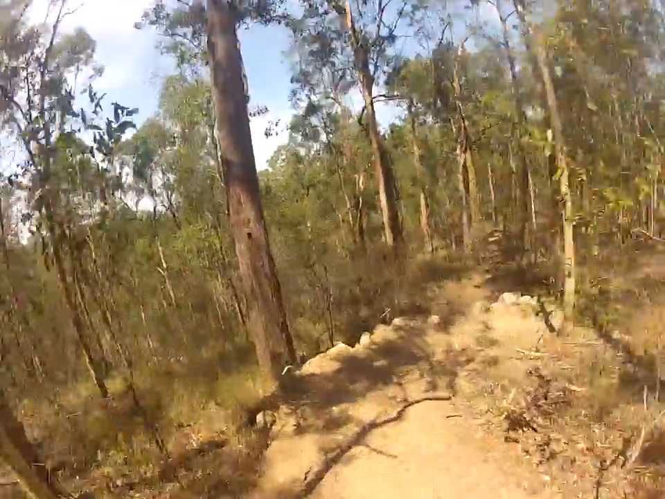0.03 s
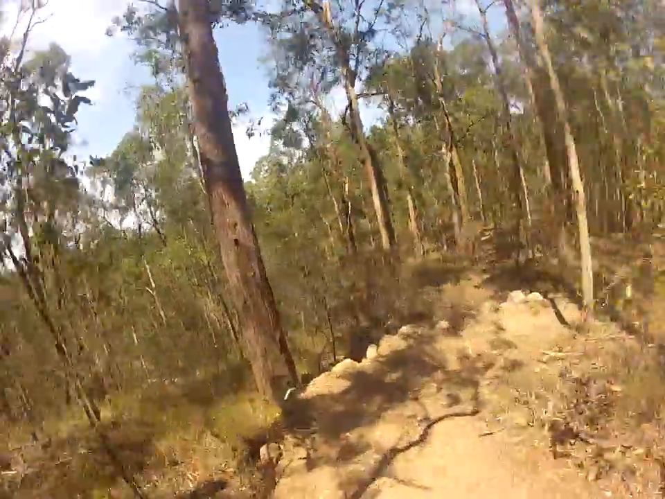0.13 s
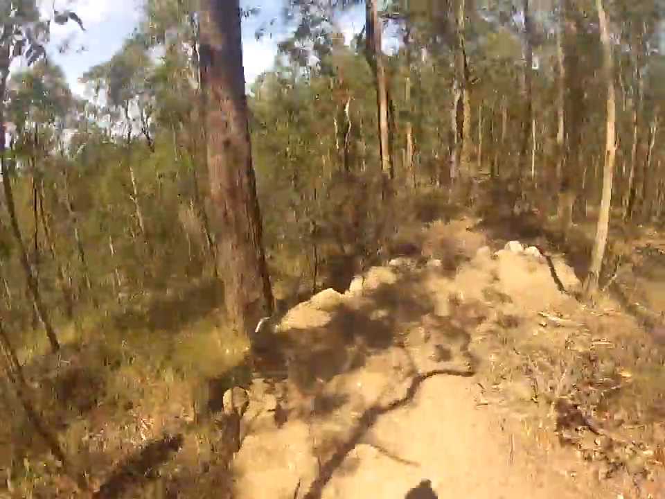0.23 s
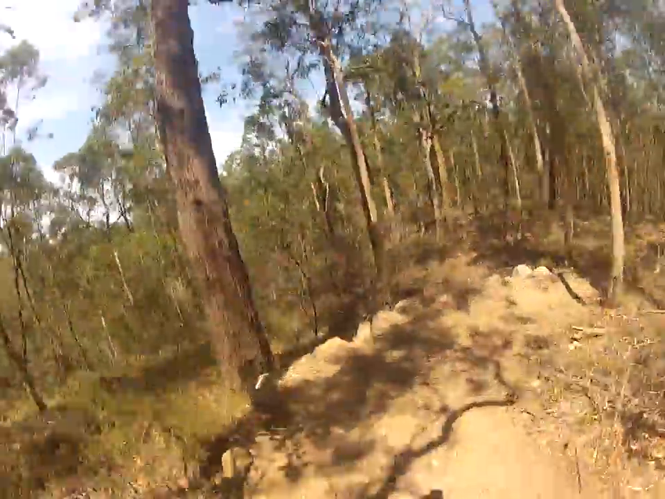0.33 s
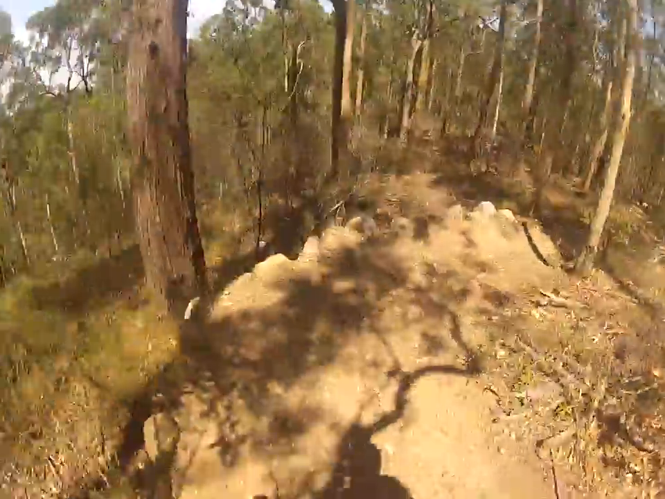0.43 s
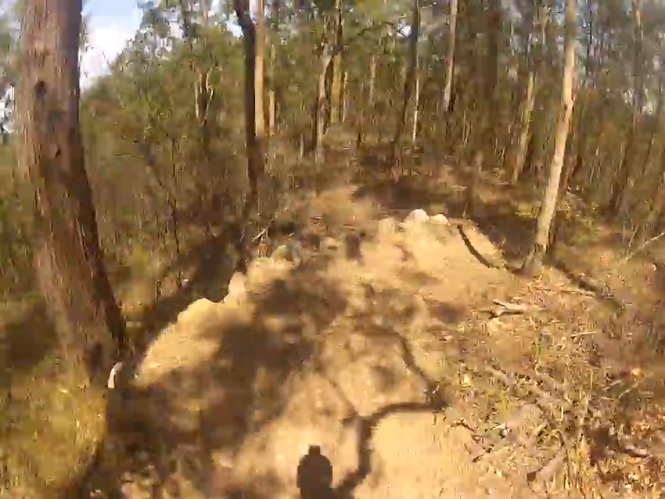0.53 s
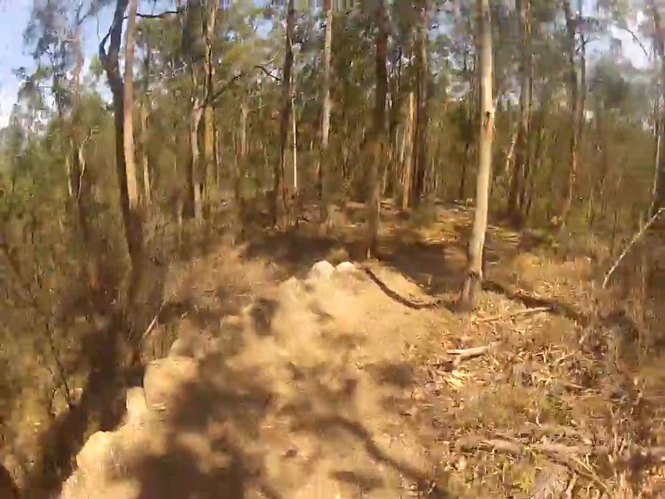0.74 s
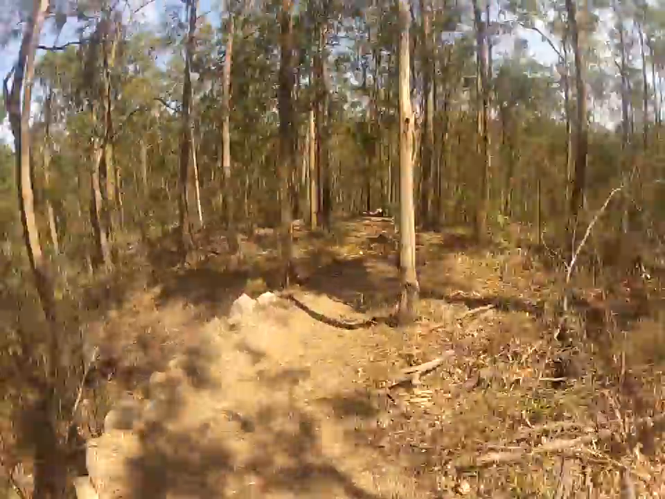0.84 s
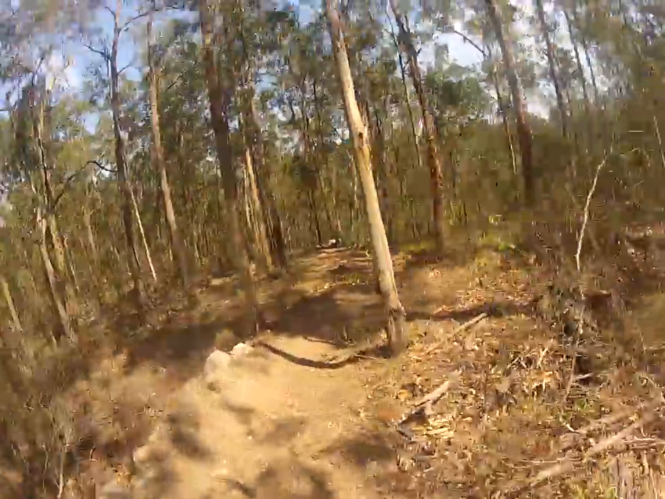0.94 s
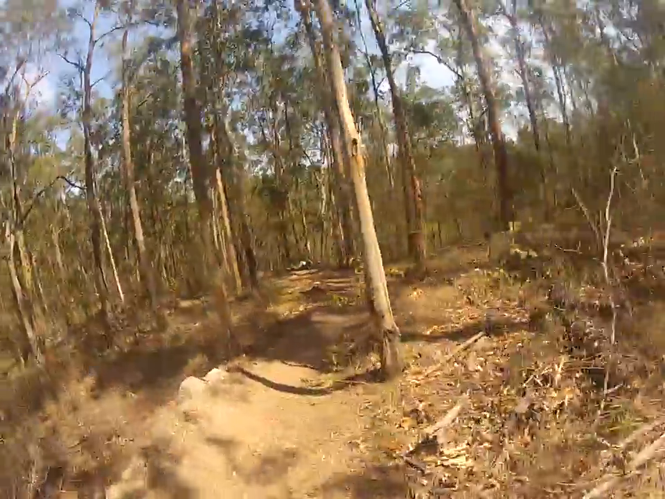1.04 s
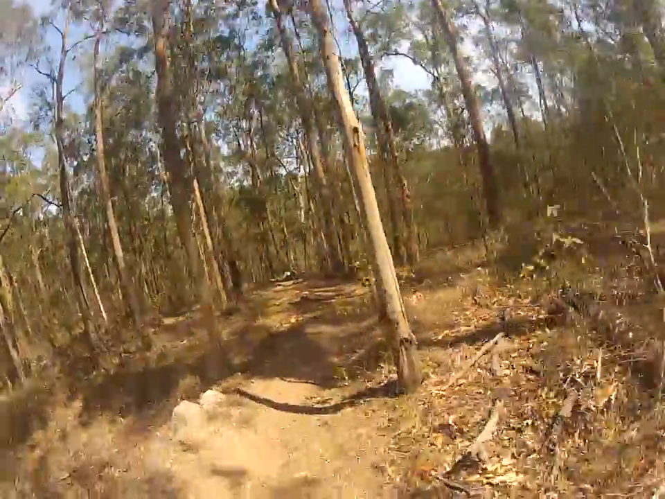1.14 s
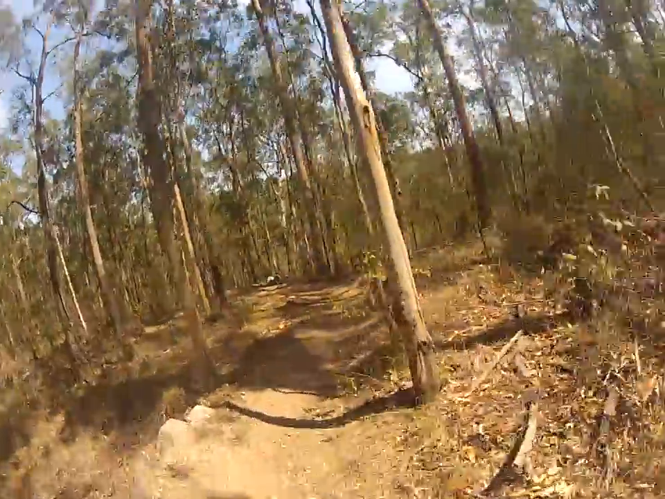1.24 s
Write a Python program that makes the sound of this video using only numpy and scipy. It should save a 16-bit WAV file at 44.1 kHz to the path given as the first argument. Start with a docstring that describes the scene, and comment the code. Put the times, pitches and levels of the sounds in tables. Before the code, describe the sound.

A mountain bike rattles and thumps over a dirt trail, with low wind rumble.

```python
"""Low thumps and wind rumble are heard as a mountain bike jolts over dry dirt, from a camera riding along.
Bumps shake the camera mount and air buffets the microphone. A hard part knocks three times and the
chain clatters, each impact exciting damped modes. The tyres scrub over grit and drone through the
frame; then the bike coasts on with a faint whirr. The recorder's sample-and-hold adds a gritty treble."""
import sys
import numpy as np
from scipy import signal
from scipy.fft import rfft, irfft
from scipy.io import wavfile

SR = 44100
rng = np.random.default_rng(int(sys.argv[2]) if len(sys.argv) > 2 else 0)


def wrap_up_sound(samples):
    """Save the sound to the file named by the first command line argument, as 16-bit audio."""
    columns = np.atleast_2d(samples).T
    # keep every value between -1 and 1, then stretch to whole-number steps
    tamed = np.clip(columns, -1, 1)
    steps = np.round(tamed * 32767).astype(np.int16)
    wavfile.write(sys.argv[1], SR, steps)


N = 57330
T = np.arange(N) / SR

# bumps that shake the camera mount (time [s], level [dB], frequency [Hz], swell time [s])
MOUNT_THUMPS = [(.036, -15, 82.6, 0.0099), (0.279, -5, 78.2, 0.011), (0.346, -11.5, 84.7, 0.0093),
                (.442, -3.5, 72.5, 0.0127), (0.5261, -5.5, 83.7, 0.0057), (0.655, -12.5, 88.4, 0.016),
                (0.702, -10.5, 83.2, 0.01), (0.744, -12, 73.7, .012)]
# buffets of air on the microphone (time [s], level [dB], frequency [Hz], swell time [s])
AIR_BUFFETS = [(0.24, -12.5, 35.4, 0.0073), (0.317, -13.5, 24.3, 0.0071), (.390, -5.5, 27.2, 0.016),
               (0.495, -2, 36.3, 0.004), (0.648, -12.5, 30, 0.01), (0.69, -5.5, 27, 0.01),
               (0.786, -18, 21.1, 0.005)]
# dull blows of the tyres on the ground (time [s], level [dB], decay time [s])
TYRE_THUDS = [(0.031, -52, 0.036), (0.24, -20.5, 0.0082), (0.264, -23.5, 0.019), (.284, -18.5, 0.0034),
              (0.4637, -17.5, 0.0089), (.525, -28, 0.0026), (.741, -29.5, 0.013), (0.803, -33, 0.0077),
              (.979, -37, 0.0037)]
# spectrum of those blows (frequency [Hz], relative level [dB])
THUD_SPECTRUM = [(70, -23), (160, 11), (260, -0.5), (420, -16.5), (700, -18), (1150, -11.5), (1700, -36),
                 (3000, -45)]
# three hard knocks, with faint ones after the first (time [s], peak level [dB])
HARD_KNOCKS = [(0.2396, -6.5), (.2665, -23), (.2845, -38), (.3255, -31), (0.4185, -11), (0.7209, -11.5)]
# modes of the knocked part (frequency [Hz], relative level [dB], t60 [s])
PART_MODES = [(945, -7.5, 0.0098), (1168, -4, 0.011), (1895, 0, .023), (2115, -11.5, 0.036),
              (2495, -9, .02), (3715, -20.5, 0.015)]
# showers of chain-link impacts (time [s], level [dB], decay time [s], tilt [dB/octave])
CHAIN_SHOWERS = [(0.266, -32.5, 0.017, -9.5), (0.3343, -28.5, 0.0077, -3), (0.386, -27, 0.0079, -3),
                 (0.4591, -18.5, 0.0048, 5), (0.462, -12.5, 0.0042, -0.5), (0.479, -14.5, 0.0039, -2),
                 (0.662, -37, 0.01, 11), (0.674, -26.5, 0.0039, 0), (0.805, -38, 0.008, -3),
                 (0.978, -40.5, 0.013, -11)]
# modes of the frame before tilting (frequency [Hz], relative level [dB], t60 [s])
FRAME_MODES = [(1140, -17, 0.018), (1665, 0.5, 0.02), (1834, 4, 0.0093), (2020, 0, 0.0096),
               (2420, 2.5, 0.016), (2853, -15, 0.074), (3040, -23, 0.0098), (3662, -8, 0.027),
               (4070, -8.5, 0.0066), (5230, -7.5, 0.005)]
# envelope of the tyre noise on dirt (time [s], level [dB])
TYRE_LEVEL = [(0, -58.5), (.05, -51.5), (.11, -55.5), (.22, -49.5), (.29, -41), (.32, -52), (.37, -42),
              (.43, -43), (.455, -32), (.50, -41), (.55, -48), (.573, -49), (.582, -34.5), (.612, -37.5),
              (.630, -35.5), (.645, -41.5), (.68, -36.5), (.70, -42), (.76, -47.5), (.87, -52), (.98, -50),
              (1.3, -55.5)]
# spectrum of rolling tyres (frequency [Hz], relative level [dB])
ROLL_SPECTRUM = [(300, -2), (650, -4), (1150, -7), (1850, 2.5), (2400, -0.5), (3000, -6), (3700, -13.5),
                 (4300, -14.5), (5800, -24.5)]
# spectrum of scrubbing tyres (frequency [Hz], relative level [dB])
SCRUB_SPECTRUM = [(300, -3.5), (700, -30), (1200, -13.5), (1600, 2), (2400, -3), (3200, -11.5), (3650, -8),
                  (4300, -20), (5200, -19), (5800, -23)]
# resonances in the tyre noise (frequency [Hz], width [Hz], lift [dB])
TYRE_RESONANCES = [(896, 100, 7.5), (1158, 186, 12.5), (1912, 55, 4), (2453, 130, 4), (2952, 140, 6),
                   (3630, 160, 6.5)]
# light ticks of the coasting hub (time [s], peak level [dB])
TICKS = [(.0045, -37), (.0675, -37.5), (.0755, -37), (.1205, -42), (.132, -37.5), (.176, -34), (.1985, -42),
         (.2125, -33)]
# modes of the hub (frequency [Hz], relative level [dB], t60 [s])
TICK_MODES = [(2020, -10, 0.011), (2415, -4.5, 0.031)]
# whirr of the coasting wheel (time [s], centre frequency [Hz], level [dB])
WHEEL_WHIRR = [(0, 2345, -55), (.10, 2350, -66), (0.138, 2380, -51), (0.269, 2400, -61.5),
               (0.801, 2829, -75), (.87, 3030, -84), (0.921, 2950, -51.5), (1.051, 2937, -67),
               (1.17, 2465, -57), (1.3, 2280, -59)]
# small stones flicked by the tyres (time [s], level [dB], decay time [s])
STONE_FLICKS = [(.884, -61, 0.0046), (1.138, -53, 0.008)]
# spectrum of a flicked stone (frequency [Hz], relative level [dB])
STONE_SPECTRUM = [(2000, -25), (3600, -12), (4400, 8), (5200, -3), (6000, -18)]
# envelope of the tyre drone in the frame (time [s], level [dB])
DRONE_LEVEL = [(0, -50), (.06, -43.5), (.15, -47.5), (.22, -49), (.26, -38), (.32, -35.5), (.36, -37.5),
               (.42, -27), (.47, -21.5), (.50, -36), (.60, -45.5), (.65, -35.5), (.69, -25.5), (.73, -33),
               (.78, -48), (.89, -56.5), (.99, -55.5), (1.1, -53.5), (1.3, -53.5)]
# spectrum of the drone (frequency [Hz], relative level [dB])
DRONE_SPECTRUM = [(40, -9), (90, 7), (130, -1), (240, 0), (330, -11), (500, -21.5), (800, -32.5),
                  (1500, -49)]
# envelope of the wind rumble (time [s], level [dB])
WIND_LEVEL = [(0, -34.5), (.07, -28.5), (.12, -46), (.18, -33), (.25, -31), (.55, -20), (.595, -44.5),
              (.65, -20), (.76, -31), (.85, -31.5), (.90, -44), (1.04, -38.5), (1.3, -44)]
# spectrum of the wind (frequency [Hz], relative level [dB])
WIND_SPECTRUM = [(8, -32), (22, 3), (45, -10.5), (85, -10.5), (130, -24.5), (300, -60)]


def amp(db):
    """Amplitude grows tenfold every 20 dB."""
    return 10 ** (np.asarray(db) / 20)


def unit(x):
    """Normalisation to rms 1."""
    return x / np.sqrt(np.mean(x ** 2) + 1e-20)


def curve(points):
    """Linear interpolation of (time, value) points at every sample."""
    return np.interp(T, *np.transpose(points))


def colour(x, spectrum, peaks=()):
    """Spectral shaping, with resonances as bell-shaped lifts; the result has rms 1."""
    hz, db = np.transpose(spectrum)
    f = np.fft.rfftfreq(N, 1 / SR)
    base_db = np.interp(np.log(f + 1), np.log(hz), db)
    lift_db = sum(height / (1 + (2 * (f - centre) / width) ** 2) for centre, width, height in peaks)
    return unit(irfft(rfft(x) * amp(base_db + lift_db), N))


def noise(spectrum):
    """Filtered white noise takes on the filter's spectrum."""
    return colour(rng.standard_normal(N), spectrum)


def drift(hz):
    """Low-passed noise gives a slow random fluctuation of rms 1."""
    return unit(signal.sosfilt(signal.butter(2, hz, fs=SR, output="sos"), rng.standard_normal(N)))


def since(start):
    """Seconds since an event, zero before it."""
    return np.maximum(T - start, 0)


def burst(start, db, decay, rise_s=0.00022):
    """An impact envelope: quick rise, exponential decay."""
    t = since(start)
    return amp(db) * (1 - np.exp(-t / rise_s)) * np.exp(-t / decay)


def clicks(per_s, spread_db=0):
    """Shot noise: independent impulses of random sign."""
    size = amp(spread_db * np.minimum(rng.exponential(1, N), 4))
    return unit(size * rng.choice([-1, 1], N) * (rng.random(N) < per_s / SR))


def ring(modes):
    """Superposed damped modes; alternating signs make the ring swell just after the blow."""
    t = T[:SR // 10]
    return sum((-1) ** k * amp(db - 60 * t / t60) * np.sin(2 * np.pi * hz * t)
               for k, (hz, db, t60) in enumerate(modes))


def wobble(start, db, hz, swell):
    """A heavily damped oscillation whose envelope peaks at the swell time."""
    t = since(start)
    return -amp(db) * t / swell * np.exp(1 - t / swell) * np.sin(2 * np.pi * hz * t)


def jolts():
    """Transient excitation: tyres thud on ridges, the mount shudders, air pushes on the microphone."""
    thuds = sum(burst(*row) for row in TYRE_THUDS) * noise(THUD_SPECTRUM)
    shudders = sum(wobble(*row) for row in MOUNT_THUMPS)
    buffets = sum(wobble(*row) for row in AIR_BUFFETS)
    return thuds + shudders + buffets


def knocks(events, modes, rise_s=0.00056, glide_s=0.00099):
    """Free vibration: a hard part rings in the same modes after every blow."""
    tone = ring(modes)
    t = T[:len(tone)]
    lag = 0.41 * glide_s * (1 - np.exp(-t / glide_s))  # starts 41% flat and slides up to pitch
    tone = np.interp(t - lag, t, tone) * (1 - np.exp(-t / rise_s))
    tone /= abs(tone).max()
    return sum(amp(db) * np.interp(since(start), t, tone) for start, db in events)


def chain_clatter(links_per_s=3300, pivot_hz=2000):
    """Convolution: each click of a chain link sets off the frame's impulse response."""
    out = np.zeros(N)
    for start, db, decay, tilt in CHAIN_SHOWERS:
        frame = ring([(hz, level + tilt * np.log2(hz / pivot_hz), t60) for hz, level, t60 in FRAME_MODES])
        force = burst(start, db, decay) * clicks(links_per_s)
        out += signal.fftconvolve(force, frame / np.linalg.norm(frame))[:N]
    return out


def tyres(roll_db=-52.5, scrub_db=-26, flutter_db=4.8):
    """Contact noise: a smooth rolling hiss gives way to the shot noise of grit as the tyres scrub."""
    level = curve(TYRE_LEVEL)
    scrub = np.clip((level - roll_db) / (scrub_db - roll_db), 0, 1)  # 0 plain rolling, 1 full scrub
    grit = clicks(per_s=2700, spread_db=3.5)
    dirt = np.sqrt(scrub) * grit + np.sqrt(1 - scrub) * rng.standard_normal(N)
    rolling = colour(dirt, ROLL_SPECTRUM, TYRE_RESONANCES)
    scrubbing = colour(dirt, SCRUB_SPECTRUM, TYRE_RESONANCES)
    flutter = flutter_db * scrub * drift(hz=58)
    return amp(level + flutter) * ((1 - scrub) * rolling + scrub * scrubbing)


def hub(width_hz=480):
    """Random modulation of a tone gives the wheel's narrow-band whirr; light impacts tick in the hub."""
    pitch = curve([(time, hz) for time, hz, db in WHEEL_WHIRR])
    level = curve([(time, db) for time, hz, db in WHEEL_WHIRR])
    phase = 2 * np.pi * np.cumsum(pitch) / SR
    whirr = drift(width_hz / 2) * np.cos(phase) + drift(width_hz / 2) * np.sin(phase)
    return amp(level) * whirr + knocks(TICKS, TICK_MODES)


def stones():
    """Impact noise: each stone flicked by a tyre gives a faint, bright, decaying burst."""
    return sum(burst(*row) for row in STONE_FLICKS) * noise(STONE_SPECTRUM)


def frame_drone():
    """Structure-borne sound: the frame carries the tyres' vibration as a low drone."""
    return amp(curve(DRONE_LEVEL)) * noise(DRONE_SPECTRUM)


def wind():
    """Pressure fluctuations of the wind make a low rumble, strongest on the rough stretch."""
    return amp(curve(WIND_LEVEL)) * noise(WIND_SPECTRUM)


def scene():
    """Superposition: all sources add at one microphone."""
    impacts = jolts() + knocks(HARD_KNOCKS, PART_MODES) + chain_clatter()
    return (impacts + hub() + tyres() + stones() + wind() + frame_drone())[None]


def record(dry, ceiling=0.96, hold_hz=12000, cutoff_hz=15450):
    """Spectral imaging: after soft clipping, a slow sample-and-hold mirrors the sound into the treble."""
    soft = dry / (1 + (dry / ceiling) ** 10) ** .1
    slow = signal.resample_poly(soft, hold_hz, SR, axis=1, window=("kaiser", 5))
    steps = np.repeat(slow, 4, axis=1)
    held = signal.resample_poly(steps, SR, 4 * hold_hz, axis=1)[:, :N]
    lowpass = signal.firwin(201, cutoff_hz, window=("kaiser", 9), fs=SR)
    return signal.oaconvolve(held, lowpass[None], "same")


dry = scene()
out = record(dry)
wrap_up_sound(out)
```